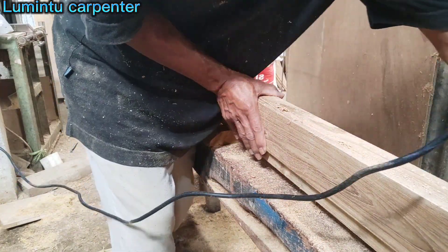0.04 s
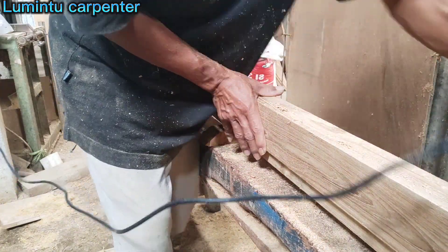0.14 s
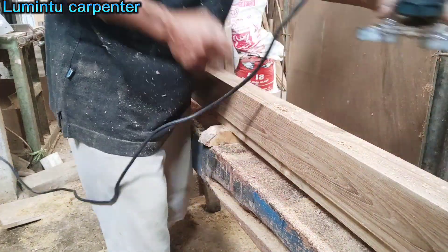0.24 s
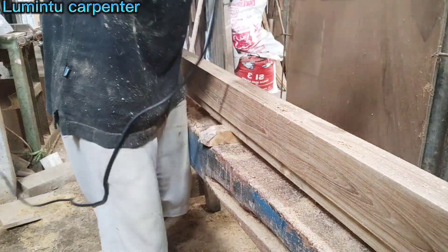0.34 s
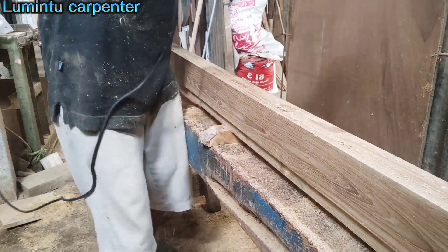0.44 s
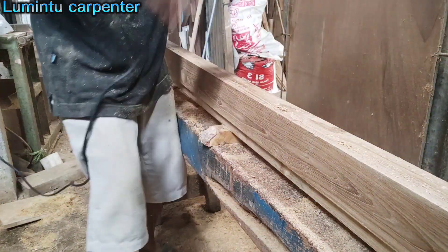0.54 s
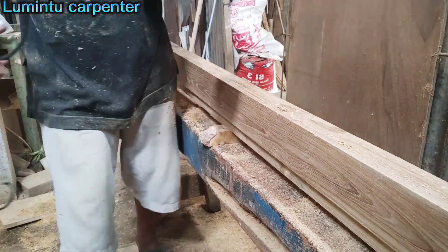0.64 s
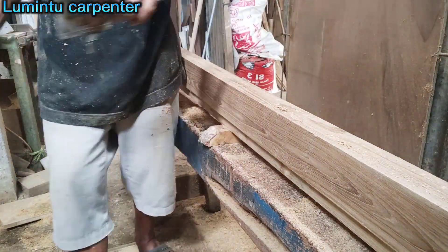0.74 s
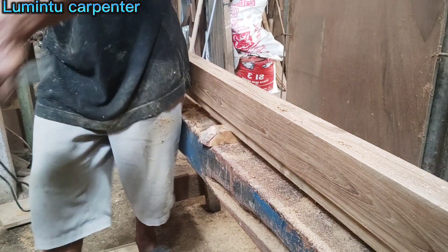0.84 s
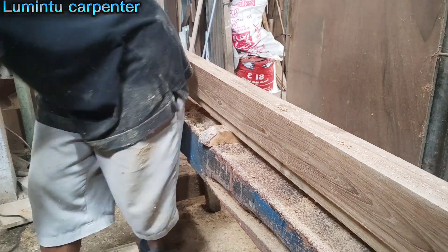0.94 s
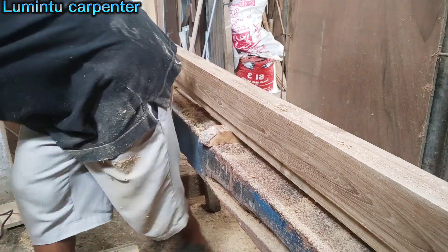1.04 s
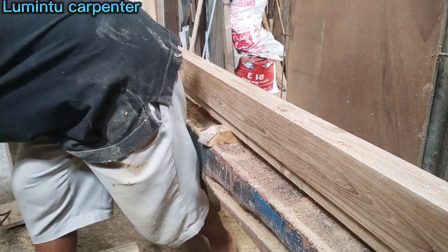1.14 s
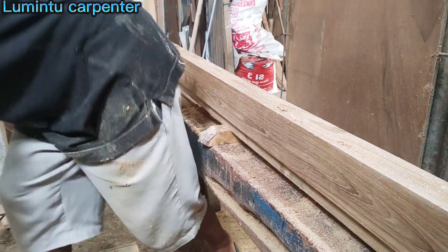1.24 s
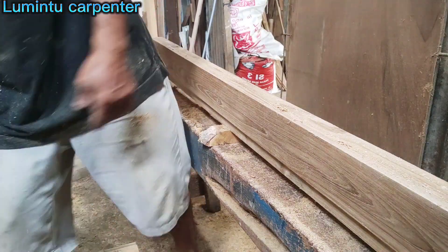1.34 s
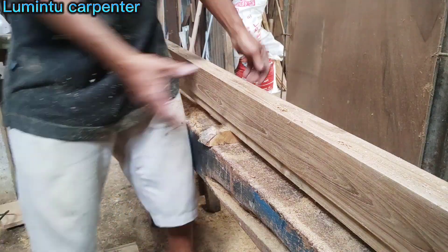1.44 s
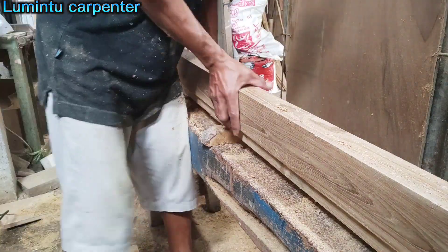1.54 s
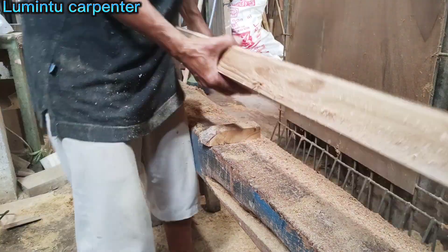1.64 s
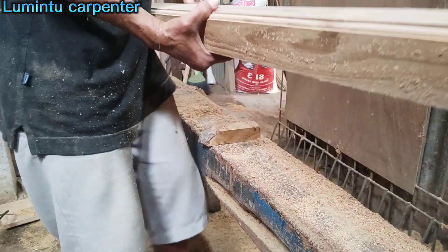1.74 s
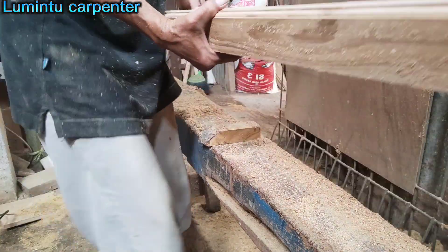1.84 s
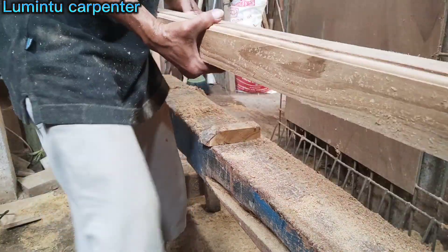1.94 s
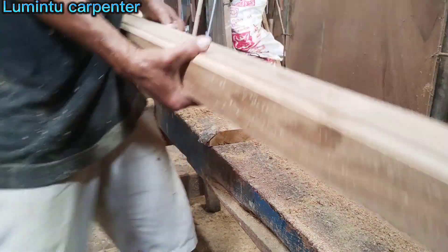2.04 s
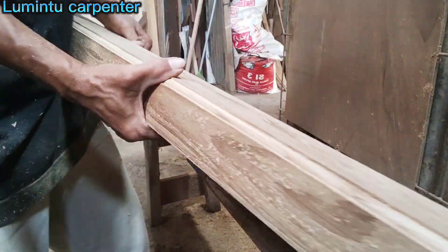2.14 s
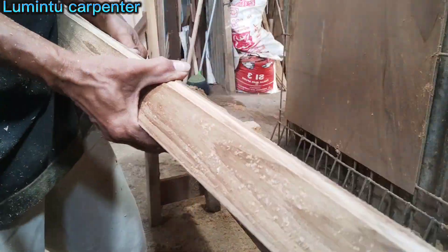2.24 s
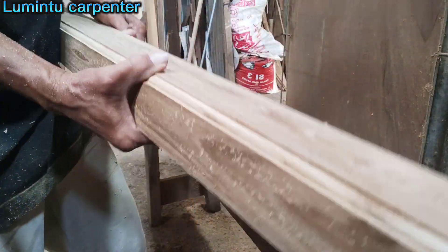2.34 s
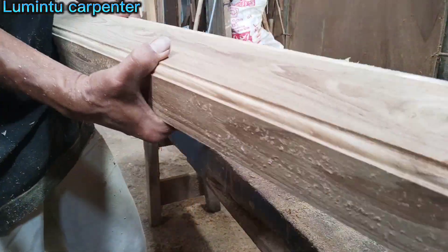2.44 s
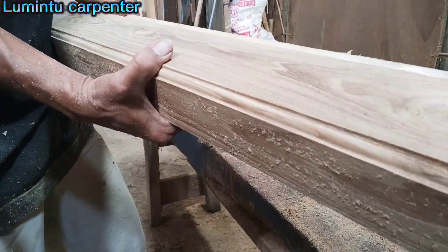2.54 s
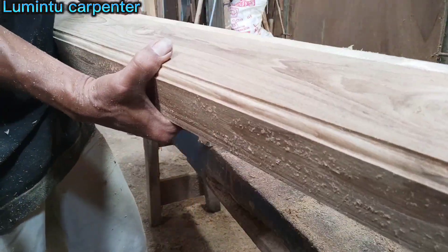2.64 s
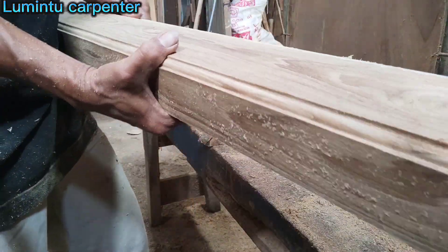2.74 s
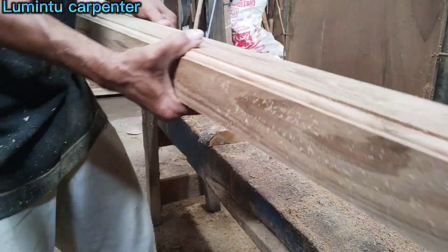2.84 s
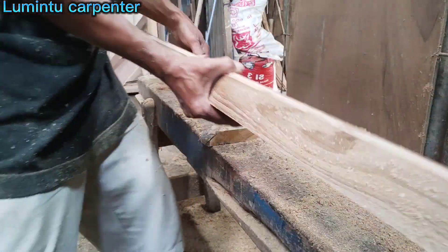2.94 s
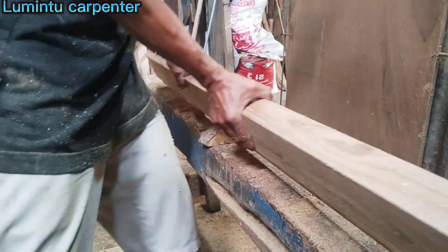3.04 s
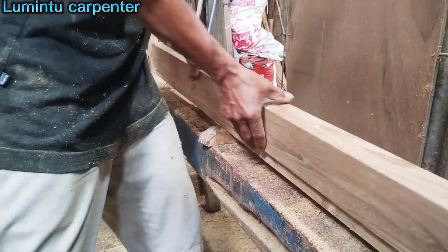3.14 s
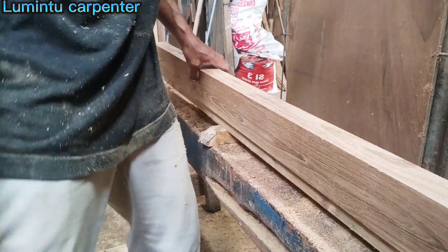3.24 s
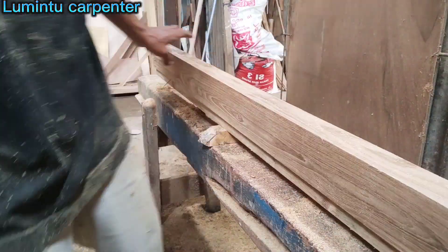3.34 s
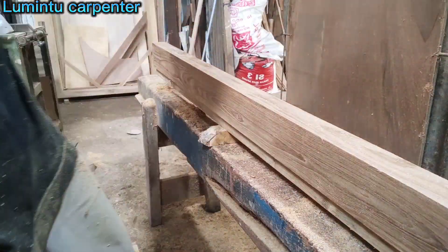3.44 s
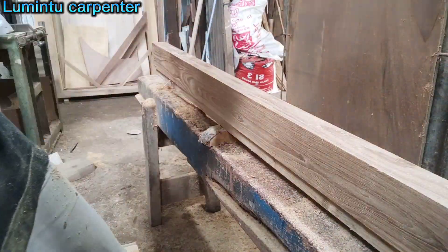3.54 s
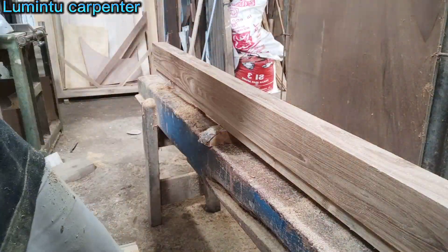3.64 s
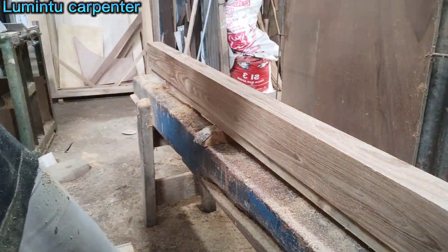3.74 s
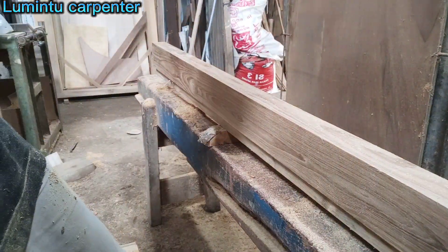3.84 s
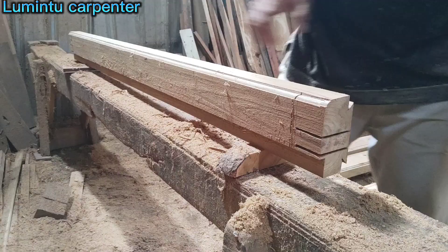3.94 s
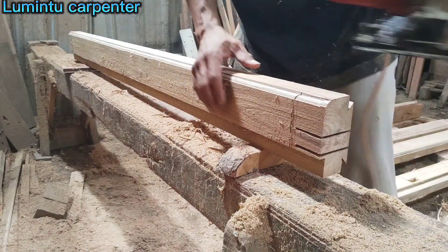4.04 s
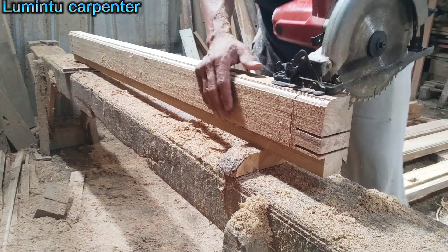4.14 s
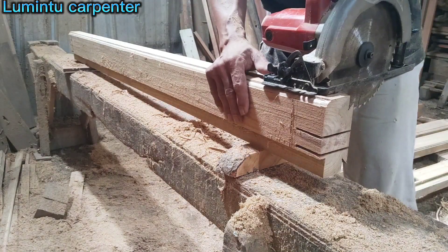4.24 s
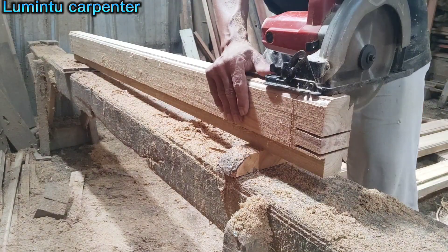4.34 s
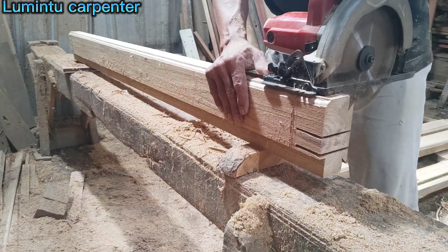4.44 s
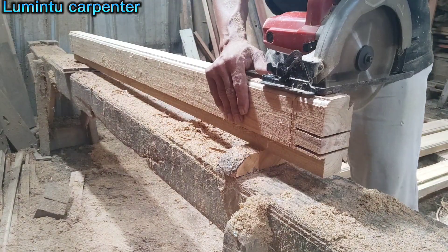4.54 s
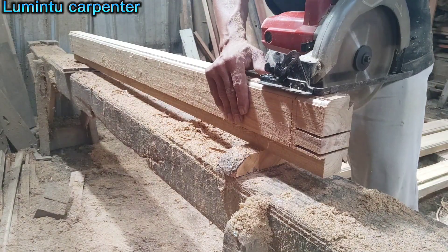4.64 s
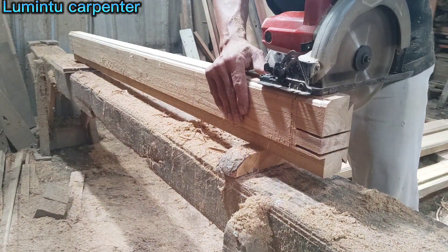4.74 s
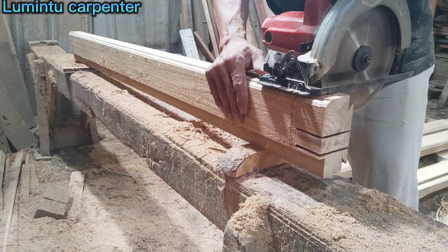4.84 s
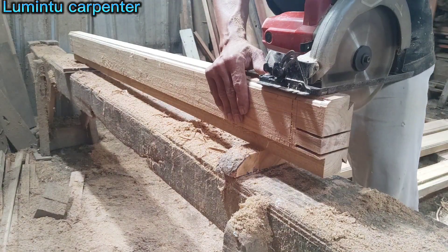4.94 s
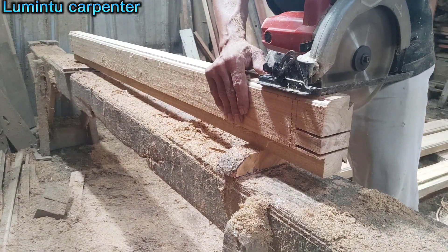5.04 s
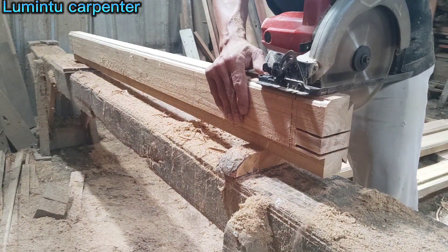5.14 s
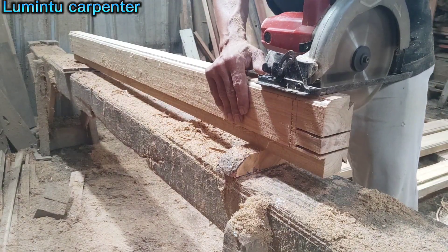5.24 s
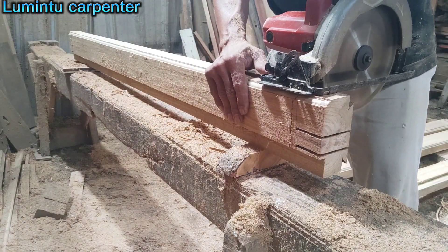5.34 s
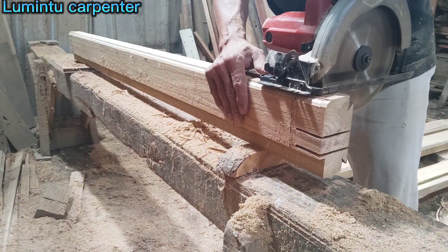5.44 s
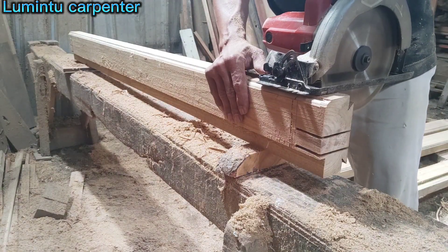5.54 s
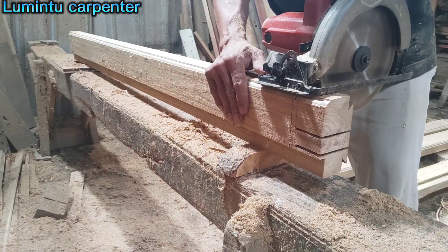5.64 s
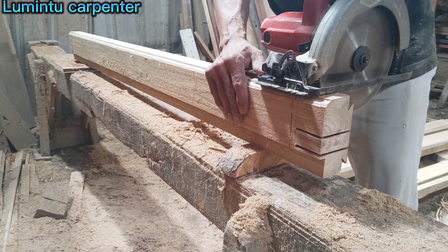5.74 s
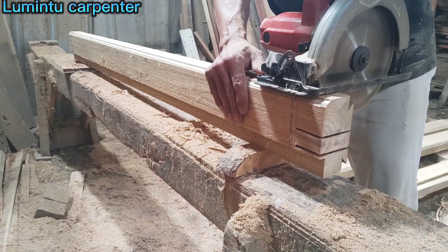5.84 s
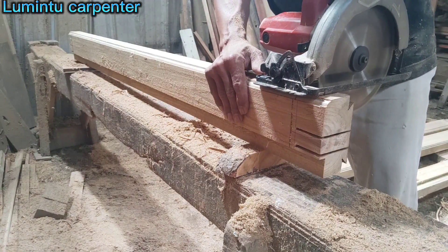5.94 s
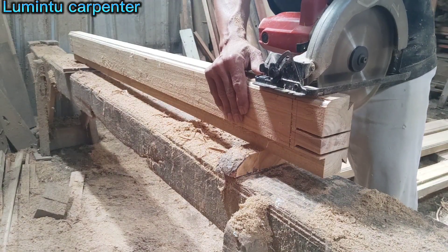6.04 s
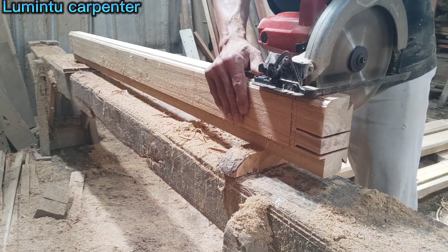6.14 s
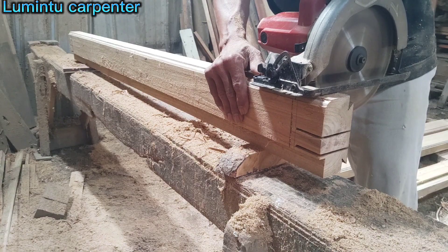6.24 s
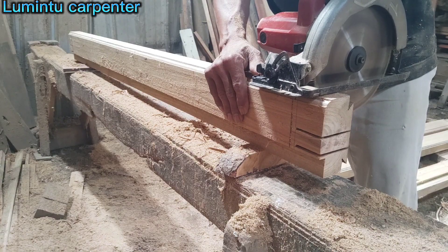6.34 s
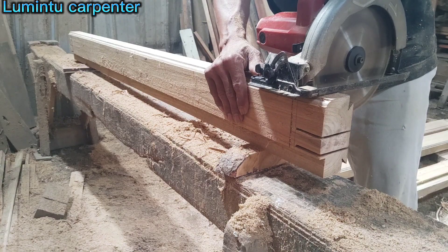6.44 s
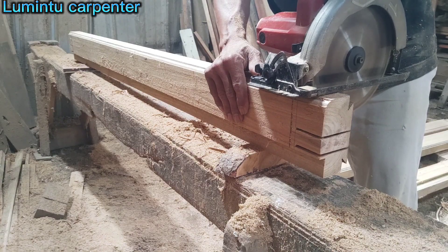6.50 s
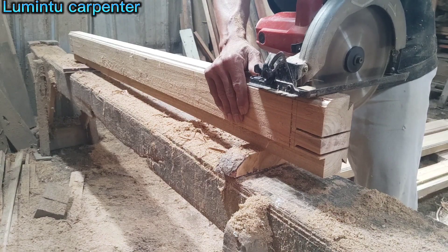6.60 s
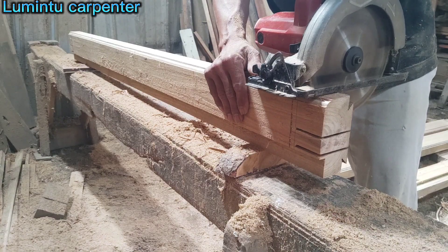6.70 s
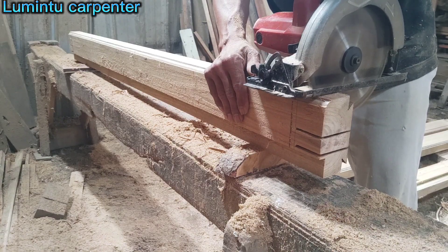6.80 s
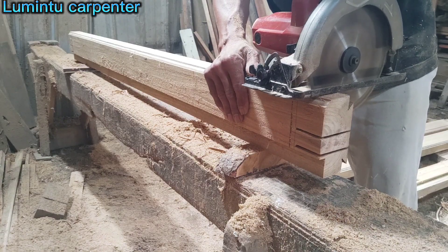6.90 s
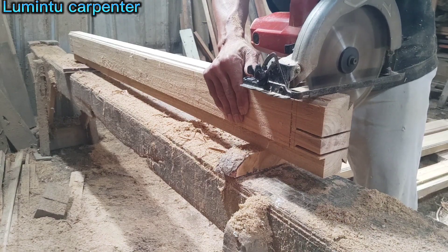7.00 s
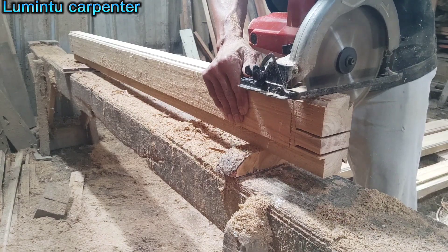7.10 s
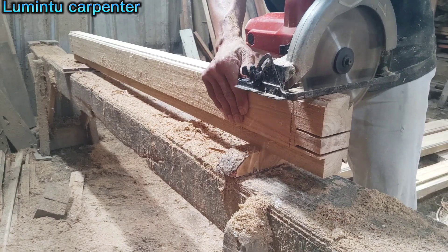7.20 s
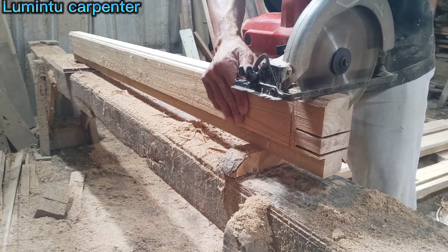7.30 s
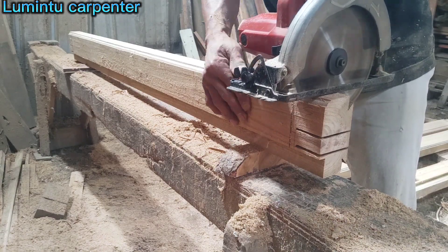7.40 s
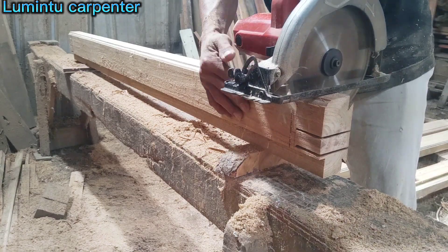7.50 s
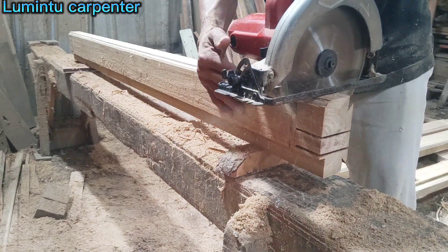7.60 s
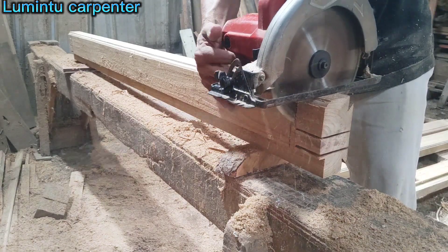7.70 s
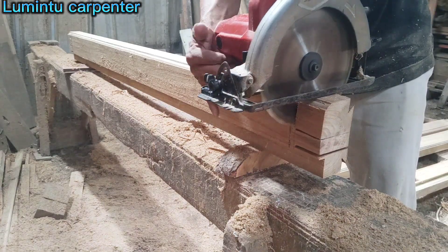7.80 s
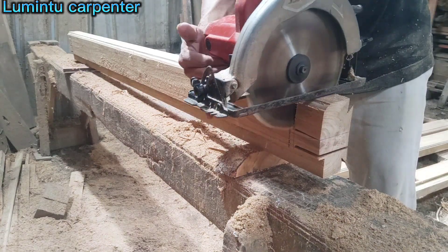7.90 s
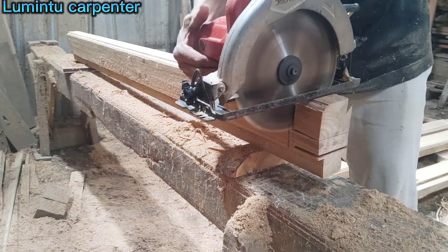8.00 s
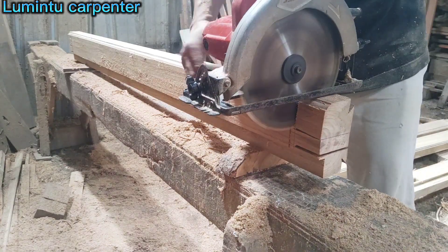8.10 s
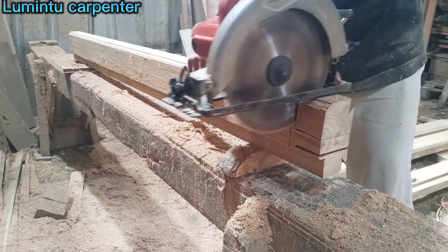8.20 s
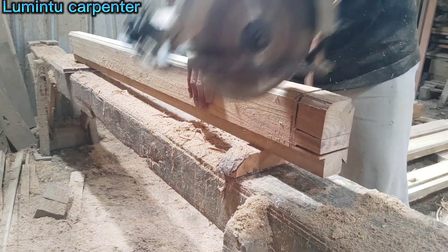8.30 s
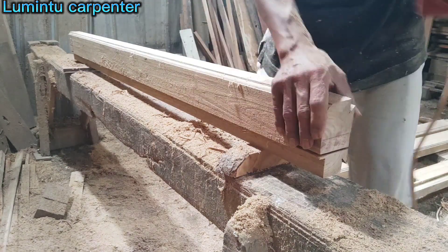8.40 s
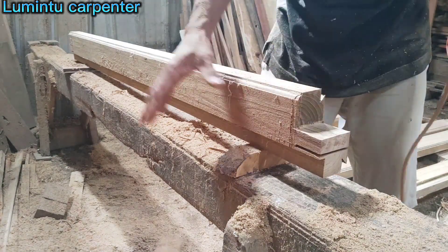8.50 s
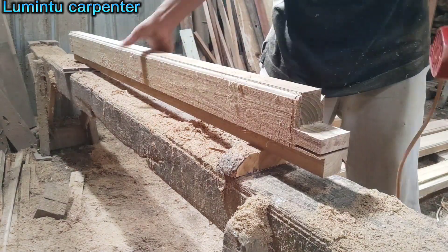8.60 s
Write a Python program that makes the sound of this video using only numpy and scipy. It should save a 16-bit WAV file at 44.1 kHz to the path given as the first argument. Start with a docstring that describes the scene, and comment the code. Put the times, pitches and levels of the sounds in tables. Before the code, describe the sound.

Spinning-down router, dull thuds of a turned beam in a quiet workshop, then a loud circular saw whining and labouring through a cut before slowing.

```python
"""In a small workshop a hand router nicks a wooden beam, is switched off and coasts to rest. Dull knocks begin
while it slows, as it is set down, and go on after, as the beam is turned over and set on the bench, with faint
ticks and chirps. Then a circular saw jolts into life, whines and rasps, and runs down. Motors are tones and air
noise that follow a turning speed; blade, housing and beam are noise rung through resonances; two microphone
ports hear it all with the workshop's short echo."""
import sys
import numpy as np
from scipy import signal
from scipy.fft import rfft, irfft, next_fast_len
from scipy.io import wavfile
from scipy.ndimage import map_coordinates

SR = 44100
rng = np.random.default_rng(int(sys.argv[2]) if len(sys.argv) > 2 else 0)


def to_wav(sig):
    """Store sig (one row per channel, or 1-D mono) as 16-bit WAV at the path in sys.argv[1].

    Samples outside -1..1 are clipped; the rate is SR.
    """
    pcm = np.clip(np.atleast_2d(sig), -1, 1) * 32767
    pcm = np.round(pcm).astype(np.int16)
    wavfile.write(sys.argv[1], SR, pcm.T)  # frames by channels


N = 381906

REST_S, HUM_END_S, SAW_ON_S = 2.08, 3.965, 4.401  # router at rest, background hum ends, saw starts
FULL_MESH_HZ = 2870  # gear-tooth rate that counts as full saw speed
PUSH_RELEASE_S = 0.03

# resonances of the saw's guard and housing: (frequency [Hz], width [Hz], level [dB])
HOUSING_MODES = [(611, 34.6, -2), (1346.6, 38, 0), (1861, 51, 0), (2774, 76, 3), (3637, 86, -2.5)]


def amp(db):
    """Decibels to gain."""
    return 10 ** (np.asarray(db) / 20)


def unit(x):
    """Scale to rms 1."""
    return x / np.sqrt(np.mean(x ** 2) + 1e-20)


def along(points, hz):
    """Interpolate (frequency [Hz], value) points on a log frequency axis."""
    f, v = np.transpose(points)
    return np.interp(np.log(hz + 1), np.log(f + 1), v)


def ramp(s, length):
    """Rise from 0 to 1 over length seconds, ending at time s."""
    return np.clip((np.arange(N) / SR - s) / length + 1, 0, 1) ** 2


def held(start, length, attack, release):
    """An envelope that has risen to 1 at start, holds for length and then falls to 0."""
    t = np.arange(N) / SR
    return ramp(start, attack) * np.clip(1 - (t - start - length) / release, 0, 1) ** 2


def wobble(rate):
    """A smooth random curve with rate knots a second."""
    knots = rng.standard_normal(int(N * rate / SR) + 4)
    grid = np.arange(0, len(knots) - 1, 1 / 6)
    return np.interp(np.arange(N) * (rate / SR), grid, map_coordinates(knots, [grid]))


def filtered(x, response):
    """x times a response of frequency."""
    m = next_fast_len(N + SR // 4, real=True)
    return irfft(rfft(x, m) * response(np.fft.rfftfreq(m, 1 / SR)), m)[..., :N]


def coloured(x, spectrum):
    """x shaped by (frequency [Hz], level [dB]) points."""
    return filtered(x, lambda f: amp(along(spectrum, f)))


def rung(x, modes):
    """x through parallel resonances of (frequency [Hz], width [Hz], level [dB])."""
    return filtered(x, lambda f: sum(amp(db) * w * f / (w * f + 1j * (f * f - c * c))
                                     for c, w, db in modes))


def noise(alike=0.039):
    """Diffuse stereo noise, only a little alike at the two ports."""
    a, b = rng.standard_normal((2, N))
    return unit(np.array([a + alike * b / 2, b + alike * a / 2]))


def bursts(times, levels_db, t60, attack=0.0038):
    """An envelope of quick onsets that die away by 60 dB in t60 seconds."""
    out, t = np.zeros(N + SR), np.arange(SR // 2) / SR
    for s, db in zip(times, levels_db):
        out[round(s * SR):][:len(t)] += amp(db - 60 * t / t60) * (1 - np.exp(-t / attack))
    return out[:N]


def orders(hz, table):
    """Tones at (multiple, level [dB]) of a turning rate, faded out between 8400 and 9600 Hz."""
    angle = 2 * np.pi * np.cumsum(hz) / SR
    return sum(amp(db) * np.sin(k * angle) * np.clip((9600 - k * hz) / 1200, 0, 1)
               for k, db in table)


def notes(rows, width_hz, edge_s=0.026):
    """Short tones blurred by phase drift: (time [s], length [s], frequency [Hz], level [dB])."""
    out, t = np.zeros((2, N + SR)), np.arange(SR // 4) / SR
    for s, length, hz, db in rows:
        steps = rng.standard_normal((2, len(t)))
        drift = np.cumsum(steps, axis=1) * np.sqrt(2 * np.pi * width_hz / SR)
        shape = np.clip(np.minimum(t, length + 2 * edge_s - t) / edge_s, 0, 1) ** 2
        tone = np.sqrt(2) * np.sin(2 * np.pi * hz * t + drift)
        out[:, round((s - edge_s) * SR):][:, :len(t)] += amp(db) * shape * tone
    return out[:, :N]


def bent(x, ratio):
    """Stereo x with its pitch scaled by a changing ratio."""
    position = np.cumsum(ratio)
    return np.array([map_coordinates(side, [position]) for side in x])


def driven(speed, db, knee, power):
    """Gain of a motor sound: steady at speed, fading as a power of speed below its knee."""
    return amp(db) / np.sqrt(1 + (knee / np.maximum(speed, 1)) ** (2 * power))


def room(x, wet_db):
    """Blend a source with the workshop's short echo, different at each port."""
    # echo decay of the walls: (frequency [Hz], t60 [s])
    walls = [(200, 0.095), (10000, 0.12)]
    hz, t, z = signal.stft(rng.standard_normal((2, SR // 3)), SR, nperseg=256)
    decay = amp(-60 * t / along(walls, hz)[:, None])
    tail = signal.istft(z * decay, SR, nperseg=256)[1]
    echo = signal.fftconvolve(np.atleast_2d(x), tail / np.linalg.norm(tail[0]), axes=1)[:, :N]
    return (x + amp(wet_db) * echo) / np.sqrt(1 + amp(wet_db) ** 2)


def saw():
    """Gears set the speed; pushes into the wood set how hard the teeth rasp and shake the beam."""
    # gears run up, labour in the cut and run down: (time [s], mesh pitch [Hz], whine level [dB])
    gear_course = [(4.4, 1502, -31), (4.44, 1921, -26), (4.5, 2230, -26), (4.62, 2692, -35.5),
                   (4.98, 2864, -29.5), (5.25, 2830, -47), (5.47, 2701, -34.5), (5.88, 2866, -30.5),
                   (6.2, 2817, -24.5), (6.75, 2753, -25.5), (7, 2641, -29.5), (7.36, 2400, -22.5),
                   (7.76, 2444, -28), (7.93, 1849, -42), (8.05, 1509, -30), (8.2, 1278, -29.5),
                   (8.36, 1009, -35), (8.66, 601, -56)]
    times, *controls = np.transpose(gear_course)
    mesh, whine_db = (np.interp(np.arange(N) / SR, times, c) for c in controls)
    slowness = np.clip((FULL_MESH_HZ - mesh) / 419, 0, 1)  # 1 at 419 Hz or more below full pitch
    judder, cutting = pushing()

    # as it is drawn out along the cut the blade rings, then more faintly in free air
    out_s, rise_s = 8.28, 0.32
    drawn_out = amp(-22) * held(out_s, 0.175, rise_s, PUSH_RELEASE_S)
    freed = np.hypot(drawn_out, amp(-31.5) * ramp(out_s, rise_s))

    # the blade turns once in 43 gear teeth and rubs unevenly
    blade_turn = np.sin(2 * np.pi * np.cumsum(mesh) / SR / 43)
    strikes = amp(blade_turn + wobble(900) + 0.52 * wobble(220) + wobble(30) / 2)

    running = saw_gears(mesh, whine_db, slowness, freed) + saw_drive(mesh, strikes)
    running += saw_steel(mesh, slowness, cutting, freed, strikes) + saw_wood(judder)
    return running * ramp(SAW_ON_S, 0.014) + saw_jolt()


def pushing():
    """Gains of judder and rasp as the blade is pushed in; overlapping pushes add in power."""
    # pushes into the wood: (time [s], length [s], beam judder level [dB], steel rasp level [dB])
    pushes = [(4.422, 1.4, -42, -25), (4.728, .66, -41.5, -20), (5.103, .26, -33, -21),
              (5.464, .18, -47, -22), (5.805, .11, -43, -19), (5.949, 1.07, -38, -20),
              (7.046, .8, -38.5, -22.5), (7.703, .14, -33.5, -25.5), (7.853, .31, -57, -19.5),
              (8.062, .08, -35, -22.5)]
    shapes = np.array([held(s, length, 0.036, PUSH_RELEASE_S) for s, length, *_ in pushes])
    powers = amp(np.array(pushes)[:, 2:].T) ** 2
    return np.sqrt(powers @ shapes ** 2)


def saw_gears(mesh, whine_db, slowness, freed):
    """Backlash makes the gear speed flutter: a blurred whine inside a wider howl."""
    angle = 2 * np.pi * np.cumsum(mesh) / SR
    whine = orders(mesh * (1 + 0.016 * wobble(700)), [(1, 0), (2, -18), (3, -17)])
    # slowed random curves narrow the howl as the gears slow
    swing = bent([wobble(600) for _ in range(2)], mesh / FULL_MESH_HZ)
    howl = np.sum(swing * [np.sin(angle), np.cos(angle)], axis=0)
    howl_gain = amp(-14 + 11 * slowness)  # against the whine, louder when the gears turn slowly
    gears = room(amp(whine_db + 1.9 * wobble(20)) * (whine + howl_gain * howl), wet_db=5.5)
    # the whine rings the housing
    gears = gears + rung(gears, HOUSING_MODES) / 4
    # out of the wood, the unloaded gears buzz with overtones
    overtones = orders(mesh * (1 + 0.02 * wobble(400)), [(k, 0) for k in range(2, 8)])
    return gears + room(freed * amp(-21) * overtones, wet_db=4)


def saw_drive(mesh, strikes):
    """The running drive rushes, rings its housing and guard, and adds a low drone."""
    # rush of the drive: (frequency [Hz], level [dB])
    rush_colour = [(120, -47), (600, -9), (1100, -5.5), (2300, 0.5), (3000, -4.5), (3400, -8), (3900, -6),
                   (4600, -12), (8000, -24)]
    # the drive is a little quieter while the cut is still shallow
    shallow = 1 - ramp(6.05, 0.43)
    rush = driven(mesh, db=-23.5, knee=1616, power=2.3) * amp(-1.0 * shallow)
    body = unit(coloured(strikes * noise(), rush_colour))
    body += amp(-4) * unit(rung(strikes * noise(), HOUSING_MODES))

    # one guard mode rings once the cut is deep, and as the slowing gears pass its pitch
    swell = amp(-25) * held(8.07, 0.18, 0.2, 0.15)
    guard_gain = np.hypot(swell, amp(-9.5) * rush * (1 - shallow))
    guard = guard_gain * unit(rung(noise(), HOUSING_MODES[1:2]))

    drone_mode = [(147.3, 43, 0)]
    drone = unit(rung(rung(noise(), drone_mode), drone_mode))
    return rush * body + guard + amp(-51) * (mesh / FULL_MESH_HZ) ** 2 * drone


def saw_steel(mesh, slowness, cutting, freed, strikes):
    """Teeth striking the wood rasp and ring the blade, whose modes sink as it slows."""
    # rasp of the teeth: (frequency [Hz], level [dB])
    rasp_colour = [(4000, -29.5), (5800, -18.5), (6500, -7), (8500, -0.5), (10000, -17.5), (15000, -25)]
    # blade in the cut, its lower modes, and blade leaving it: (frequency [Hz], width [Hz], level [dB])
    cut_modes = [(6090, 47, -12), (6385, 50, -8), (6812, 120, -6), (7119, 60, -3), (7400, 110, -3),
                 (7500, 70, 0), (7963, 70, -3.5), (8150, 70, -5.5), (8560, 150, -2.5), (8648, 40, 0),
                 (8872, 50, -9)]
    low_modes = [(3770, 70, -3), (4070, 50, 1.5), (5020, 100, -0.5), (5367, 120, 0.5)]
    free_modes = [(3683, 120, -9), (6780, 80, 1), (7160, 55, 3.5), (7560, 110, -4.5), (8400, 190, -2)]
    # blade squeals on the sides of the cut: (time [s], length [s], frequency [Hz], level [dB])
    squeals = [(5.855, 0.032, 9490, -23.5), (8.26, 0.064, 3890, -31.5), (8.35, .07, 3667, -32)]

    rasp = amp(-3) * unit(coloured(strikes * noise(), rasp_colour))
    ring_colour = [(4500, -106), (6200, -3.5), (9500, -5.5), (11000, -8.0)]
    ringing = unit(coloured(rung(strikes * noise(), cut_modes), ring_colour))
    low = unit(coloured(rung(strikes * noise(), low_modes), [(2000, -20), (3700, -1)]))

    # spin stiffens the blade; as it slows, its low modes gain and all its pitches fall
    slack = slowness * (1 - (mesh / FULL_MESH_HZ) ** 2)
    steel = rasp + amp(wobble(28) / 2) * ringing + amp(-15.5 + 11 * slack) * low
    steel = room(bent(steel, 1 - 0.048 * slack), wet_db=-5)
    level = np.hypot(cutting, driven(mesh, db=-21.5, knee=1720, power=2.6))

    free = unit(coloured(rung(strikes * noise(), free_modes), [(9000, 2.0), (11000, -22.5)]))
    return level * steel + freed * amp(wobble(33)) * free + notes(squeals, width_hz=33)


def saw_wood(judder):
    """The pushed blade judders the beam, and snagging teeth thump it."""
    # teeth snag the beam: (time [s], level [dB])
    snags = [(4.768, -27.5), (5.212, -26.5), (5.298, -28), (7.742, -22)]
    # judder of the beam: (frequency [Hz], level [dB])
    judder_colour = [(25, -35), (90, -27), (145, -1.5), (220, -0.5), (420, 0), (900, -2), (1600, -11),
                     (5500, -16), (11000, -30.5)]
    judder = np.hypot(judder, bursts(*np.transpose(snags), t60=0.09))
    rough = unit(coloured(amp(2.6 * wobble(260)) * noise(), judder_colour))
    # the bench shakes too, fully once judder reaches -32 dB and far less below it
    bench_gain = np.minimum(judder / amp(-32), 1) ** 3 * amp(-45)
    bench = bench_gain * unit(coloured(noise(), [(25, 0), (70, -6), (200, -25)]))
    return judder * amp(3 + wobble(18)) * rough + bench


def saw_jolt():
    """The starting jolt slams the gears together and rings the guard."""
    slam = unit(rung(noise(), [(1325, 160, 0.5), (920, 360, -4), (505, 200, -6.5)]))
    ring = np.sin(2 * np.pi * 1340 * np.arange(N) / SR)
    return bursts([SAW_ON_S], [-16], t60=0.14) * slam + bursts([SAW_ON_S], [-17], t60=0.17) * ring


def router():
    """Tones and air follow the shaft as the router coasts down and is carried off to the right."""
    speed = router_speed()
    angle = 2 * np.pi * np.cumsum(speed) / SR
    # imbalance of the shaft hums; its level dips briefly
    hum_gain = driven(speed, db=-28, knee=397, power=3.8)
    hum_gain = hum_gain * amp(1.5 * wobble(14) - 13 * held(0.21, 0.1, 0.1, 0.14))
    hum = hum_gain * orders(speed, [(1, -1.0), (2, -11.5)])

    # carried away between 0.075 and 1 s, losing 11 dB as tones and air move from left to right
    away = np.clip((np.arange(N) / SR - 0.075) / (1 - 0.075), 0, 1)
    left_minus_right_db = 2 + (-3.5 - 2) * away
    pan = amp(np.array([left_minus_right_db, -left_minus_right_db]) / 2)
    motor = (router_air(speed, angle) + room(router_tones(speed), wet_db=5.0)) * pan
    motor += room(hum, wet_db=-9.0)
    return motor * amp(-11 * away) + router_nick(angle)


def router_speed():
    """The shaft gains speed, is switched off, and is braked by friction and air drag."""
    t = np.arange(N) / SR
    first_hz, top_hz, rise_s = 310, 392, 0.36  # turns a second under power
    friction_hz_per_s, drag_hz = 211, 595  # drag equals friction at drag_hz
    powered = top_hz - (top_hz - first_hz) * np.exp(-t / rise_s)
    coasting = drag_hz * np.tan(friction_hz_per_s / drag_hz * np.maximum(REST_S - t, 0))
    return np.minimum(powered, coasting)


def router_tones(speed):
    """A six-bladed fan whistles and a twelve-bar commutator buzzes at multiples of the shaft rate."""
    # blade tone and its overtones: (level [dB], shaft rate below which it fades [Hz])
    fan_tones = [(2.5, 128), (-2, 198), (-1, 302), (-1.5, 260)]
    # how the casing passes the fan's tones: (frequency [Hz], level [dB])
    casing = [(650, -1), (1150, -7.5), (1750, -0.5), (2100, -0.5), (4200, -1), (6200, 1)]
    flutter = speed * (1 + 0.0045 * wobble(300))
    fan = sum(orders(flutter, [(6 * k, db)]) * driven(speed, 0, knee, 7)
              for k, (db, knee) in enumerate(fan_tones, 1))
    whistle_gain = driven(speed, db=-27, knee=120, power=4.6) * amp(1.7 * wobble(22))

    # the small commutator radiates its higher tones best: 5 dB an octave up to order 72
    commutator = [(k, 5 * np.log2(min(k / 72, 1))) for k in 12 * np.arange(2, 10)]
    bars = orders(speed * (1 + 0.006 * wobble(400)), commutator)
    bars = coloured(bars, [(1600, -22), (2100, -3), (6500, 2)])
    buzz_gain = driven(speed, db=-30.5, knee=100, power=3.5) * amp(3.5 * wobble(150))
    return whistle_gain * coloured(fan, casing) + buzz_gain * bars


def router_air(speed, angle):
    """Cooling air dies away with the fan; bearings and brushes scrape harder once a turn."""
    # cooling air, then bearing hiss: (frequency [Hz], level [dB])
    air_colour = [(60, -45), (150, -26.5), (450, -15), (750, -0.5), (1400, 0), (2200, -1), (3500, 0.5),
                  (8000, -30.5)]
    bearing_colour = [(1470, -42), (2500, -26.5), (3920, -12), (4620, -10.5), (8680, 4.5), (10500, -23),
                      (15000, -27)]
    scrape = amp(2 * np.sin(angle) + 1.3 * wobble(500) + wobble(25))
    air = driven(speed, db=-30, knee=265, power=2.06) * unit(coloured(noise(), air_colour))
    hiss = unit(coloured(scrape * noise(), bearing_colour))
    return air + driven(speed, db=-21.5, knee=73, power=2.1) * hiss


def router_nick(angle):
    """The cutter clips the wood once a turn for a moment."""
    # cutter on wood: (frequency [Hz], level [dB])
    nick_colour = [(400, -30), (1300, -0.5), (1900, -4.5), (2400, -2), (5500, -8), (8500, -1),
                   (10500, -33.5)]
    bites = np.diff(np.floor(angle / (2 * np.pi)), prepend=0) * amp(wobble(300))
    contact = ramp(0.07, 0.018) * (1 - ramp(0.12, 0.023))
    return room(amp(-27) * unit(coloured(bites, nick_colour)) * contact, wet_db=8.5)


def beam():
    """Each blow gives a thud of the beam and a brighter clack of the contact."""
    # blows, before the gains below: (time [s], thud level [dB], clack level [dB])
    blows = [(1.013, -59, -40), (1.204, -60, -42), (1.251, -58, -38), (2.273, -60, -52), (3.089, -37, -50),
             (3.157, -36.5, -47.5), (3.175, -52, -53), (4.204, -47, -53)]
    # resonances of the beam: (frequency [Hz], width [Hz], level [dB])
    beam_modes = [(167, 30, 13), (295, 58.4, -11), (513, 100, -16)]
    # contact: (frequency [Hz], level [dB])
    clack_colour = [(250, -17), (600, -2.5), (1500, -12.5), (2500, -29), (12000, -44)]
    s, thud_db, clack_db = np.transpose(blows)
    wood = unit(coloured(rung(noise(), beam_modes), [(600, 8.0), (2000, -22)]))
    contact = unit(coloured(noise(), clack_colour))
    thuds = bursts(s, thud_db + 5, t60=0.1, attack=0.012) * wood
    return thuds + bursts(s, clack_db + 8, t60=0.077, attack=0.0071) * contact


def shoe():
    """The saw's steel base plate rings briefly as it is set on the wood."""
    # resonances of the plate: (frequency [Hz], width [Hz], level [dB])
    plate_modes = [(540, 50, -3), (743, 45, -1), (1380, 45, 1)]
    return bursts([4.204], [-37], t60=0.082, attack=0.0059) * unit(rung(noise(), plate_modes))


def chirps(count=14):
    """Faint high chirps, heard at uneven moments while both tools are silent."""
    moment, pitch = rng.standard_normal((count, 2)).T
    times = np.linspace(REST_S, HUM_END_S, count, endpoint=False) + moment / 20
    rows = [(s, 0.012, 3800 * np.exp(0.12 * p), -76) for s, p in zip(times, pitch)]
    return notes(rows, width_hz=150)


def handling(count=22):
    """A faint, nearly regular ticking that fades, over light scuffs and an uneven rustle."""
    # light scuffs: (time [s], level [dB])
    scuffs = [(2.95, -68), (3.75, -59), (3.8964, -63), (4.114, -55.5)]
    # shared treble of ticks, rustle and scuffs: (frequency [Hz], level [dB])
    tick_colour = [(700, -18), (3200, -2), (5500, -6), (8500, -2), (11000, -29.5)]
    elapsed = 0.0962 * np.arange(count)  # tick spacing [s]
    tick_db = -60 - 2.2 * elapsed + 3 * rng.standard_normal(count)
    times = 1.4 + elapsed + 0.003 * rng.standard_normal(count)
    taps = bursts(times, tick_db, t60=0.082, attack=0.0066)
    rustle = amp(-80.5 + 3.5 * wobble(20))
    scuffing = bursts(*np.transpose(scuffs), t60=0.16, attack=0.0039)
    return (taps + rustle + scuffing) * unit(coloured(noise(), tick_colour))


def background():
    """Low room noise, handling and a passing hum; the level dips briefly and the noise returns louder."""
    # room noise: (frequency [Hz], level [dB])
    floor_colour = [(30, -6), (70, -7.5), (140, -2), (225, -1), (500, -6.5), (1500, -21.5), (5800, -32.5),
                    (7300, -22), (10500, -45.5)]
    hum_start_s = 3.4
    hum = amp(-68) * unit(rung(noise(), [(222, 10, 0)]))
    hum = hum * held(hum_start_s, HUM_END_S - hum_start_s, 0.18, 0.0153)
    dip_s, dip_length_s, dip_db = 3.972, 0.051, 39
    early_db, late_db = -66, -58.5
    floor_db = early_db + (late_db - early_db) * ramp(dip_s + dip_length_s, dip_length_s)
    floor = amp(floor_db + wobble(14)) * unit(coloured(noise(), floor_colour))
    dip = amp(-dip_db * held(dip_s, dip_length_s, 0.022, 0.048))
    return dip * (handling() + hum + floor)


def scene():
    """Both tools, the beam and the room."""
    return router() + saw() + beam() + shoe() + background() + chirps()


def record(dry):
    """The two microphone ports colour the sound differently; nothing is kept above 15.6 kHz."""
    # balance of the ports: (frequency [Hz], left minus right level [dB])
    port_balance = [(400, 3.5), (1300, 1.5), (5700, -1), (6500, -5), (7200, -6.5), (8200, 1), (8700, 9.5),
                    (10200, -1)]

    def response(f):
        pair = amp(along(port_balance, f) * np.array([[0.5], [-0.5]]))
        pair = pair / np.sqrt(np.mean(pair ** 2, axis=0))  # balance leaves the total power even
        return pair * np.clip((15600 - f) / 250, 0, 1) ** 2
    return filtered(dry, response)


dry = scene()
out = record(dry)
to_wav(out)
```